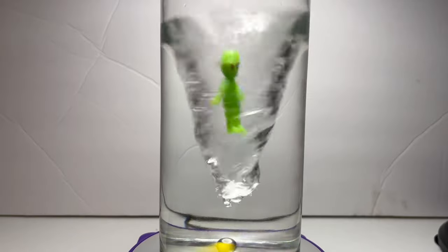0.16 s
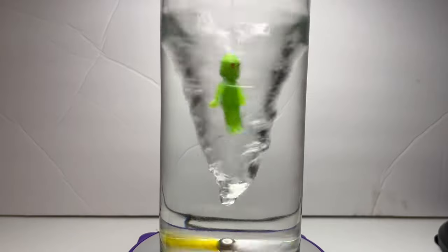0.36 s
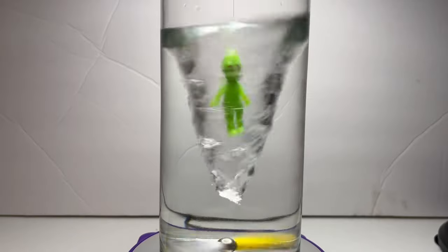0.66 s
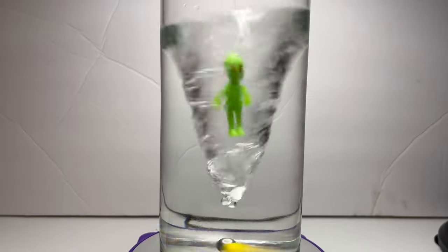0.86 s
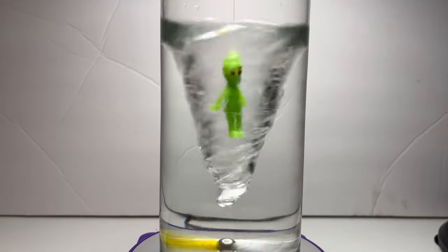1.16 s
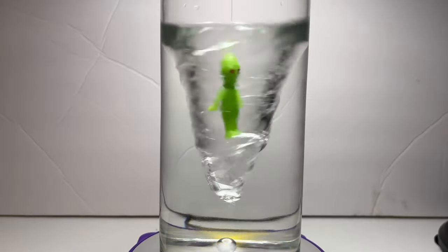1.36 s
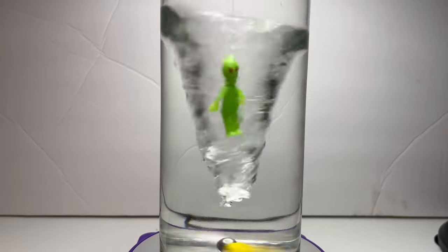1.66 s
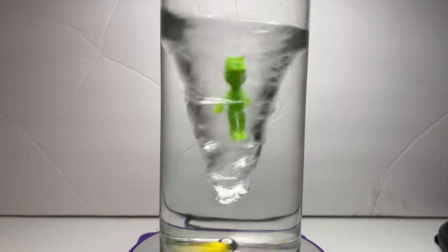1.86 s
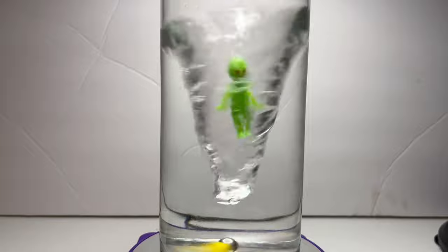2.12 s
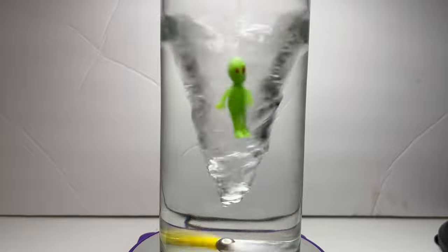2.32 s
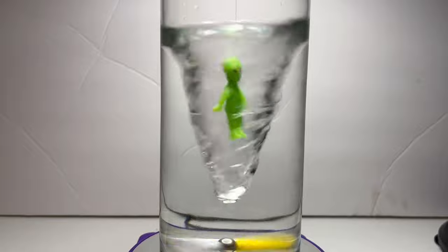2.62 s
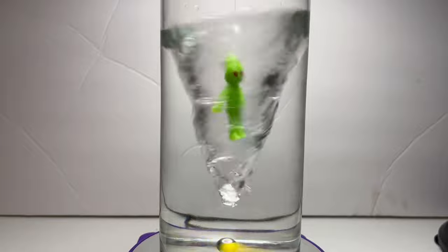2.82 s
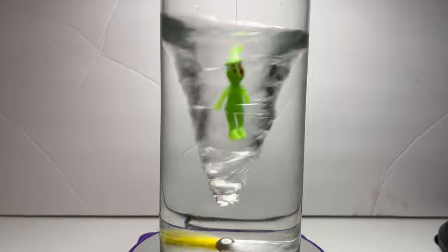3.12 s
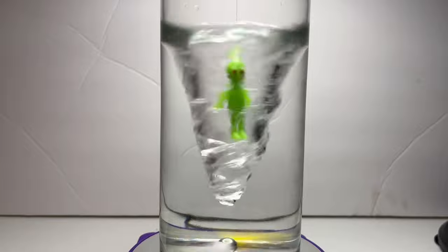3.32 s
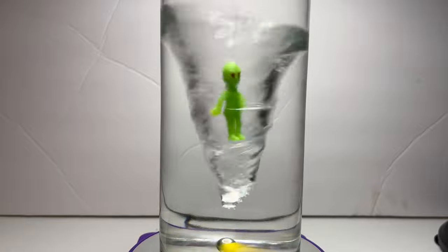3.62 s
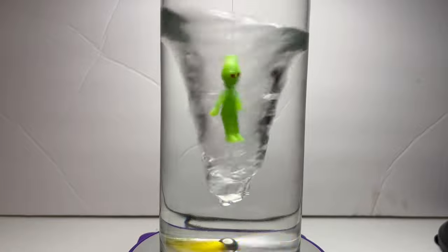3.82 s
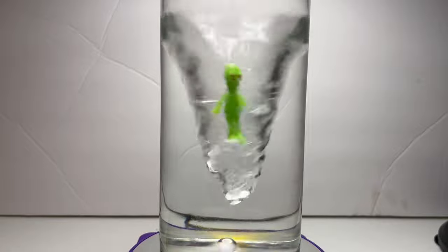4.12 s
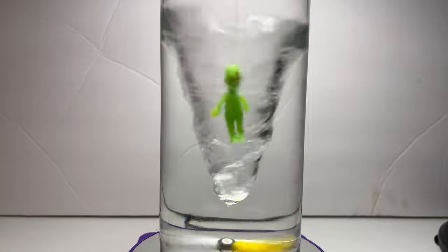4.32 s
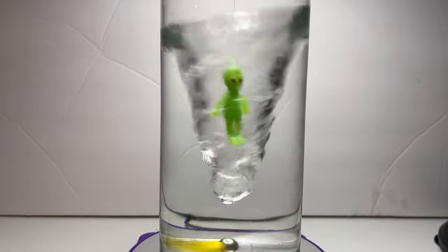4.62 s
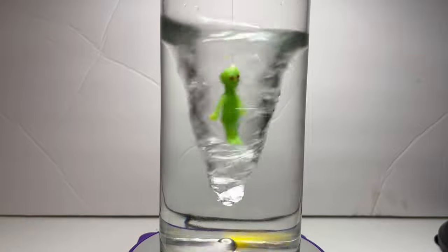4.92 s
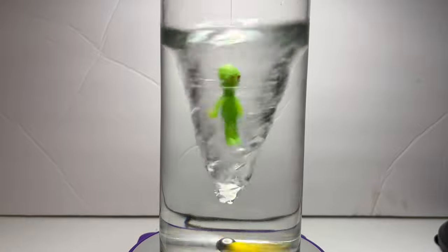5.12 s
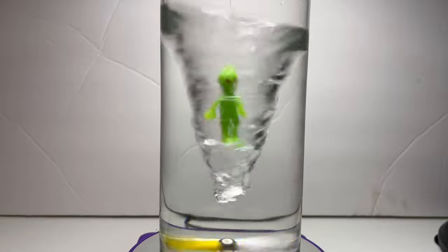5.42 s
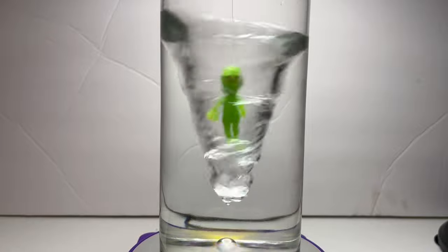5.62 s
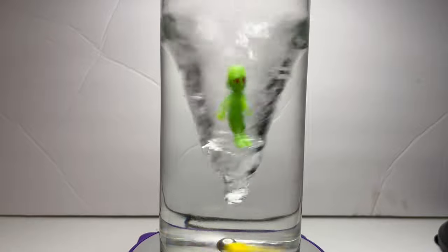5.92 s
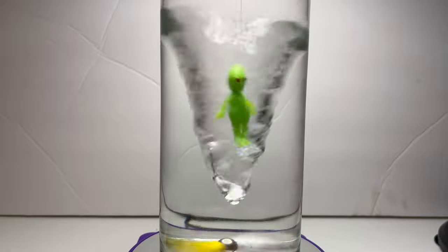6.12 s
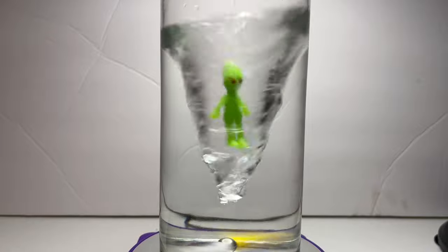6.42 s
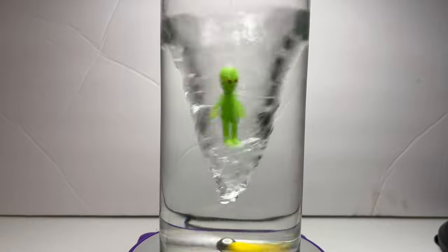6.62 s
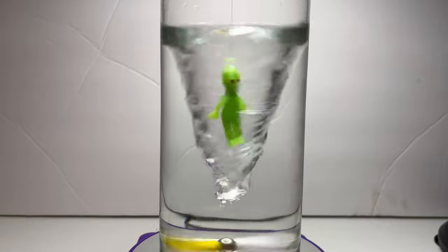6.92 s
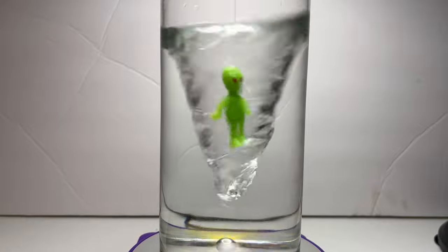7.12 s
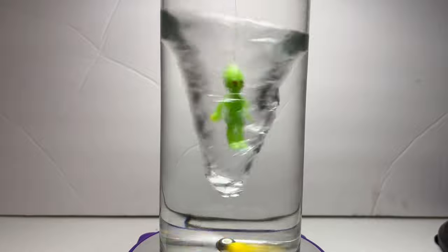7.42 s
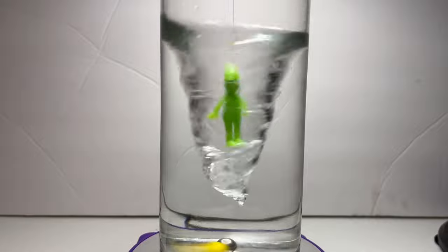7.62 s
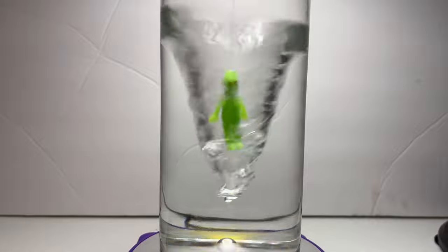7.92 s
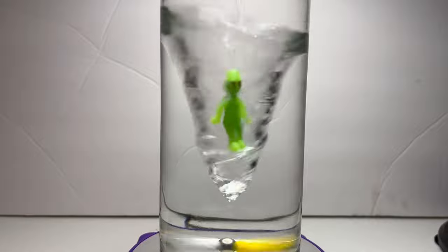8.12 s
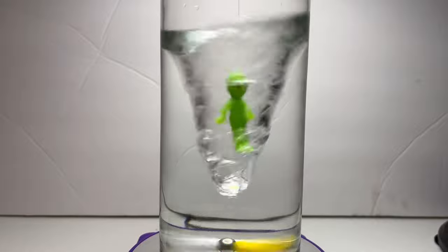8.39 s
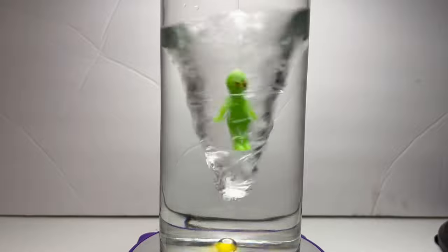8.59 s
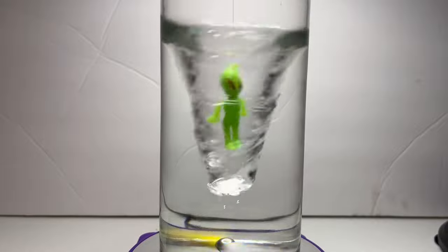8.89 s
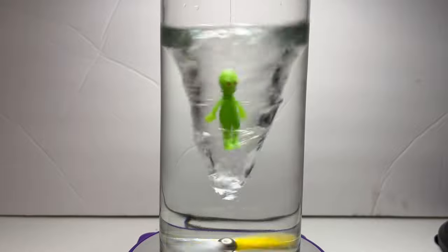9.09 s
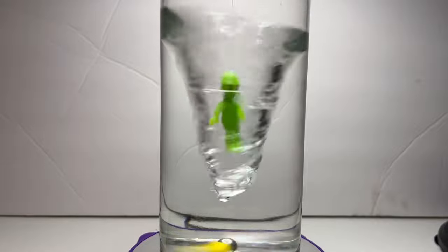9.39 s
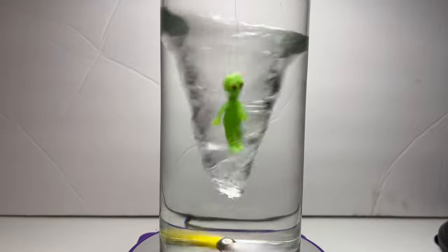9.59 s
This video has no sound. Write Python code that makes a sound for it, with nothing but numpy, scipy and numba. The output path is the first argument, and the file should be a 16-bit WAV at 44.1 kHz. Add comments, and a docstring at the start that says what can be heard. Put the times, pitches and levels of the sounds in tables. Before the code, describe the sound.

Close stereo phone pickup in a small room, with only a short diffuse reverberation. From the start, a small stir bar rattles on the bottom of a tall glass of water: fast, uneven, water-damped clicks, bright and glassy with a slight dull thump, joined by fine chatter and gritty scraping. Moderate knocks run to about 1.2 s, thin out, then return stronger in clusters from 1.7 to 2.8 s. A tight burst comes at 3.3-3.6 s, followed by a sparse lull until about 4.6 s, with a few isolated knocks. The rattle then surges, densest and loudest from 4.8 to 6.9 s, with a sharp peak near 5.8 s. It eases around 7-7.5 s, revives with a hard knock near 8.3 s, and continues in broken runs until the abrupt end near 9.75 s. Faint motor rumble, hum, thin whine and soft low gurgling persist underneath, slightly stronger after 4.8 s.

```python
"""Stir bar rattling in a glass

A stir bar skips on the bottom of a tall glass of water in uneven runs, close to a phone in a small room.
Knocks are swelling, decaying modes of glass, water column and stand; light chatter and grating noise fill the runs.
The whirlpool gurgles as low decaying tones. The motor below is coloured noise, wavering tones and a tick per turn.
Two microphone ports hear it all in stereo; the room returns a short diffuse tail of the bar."""
import sys
import numpy as np
from scipy import signal
from scipy.fft import rfft, irfft, next_fast_len
from scipy.io import wavfile
from scipy.ndimage import uniform_filter1d
from numba import njit

SR = 44100
rng = np.random.default_rng(int(sys.argv[2]) if len(sys.argv) > 2 else 0)


def pcm_store(signal):
    """Save signal as 16-bit PCM."""
    levels = np.round(np.clip(np.atleast_2d(signal), -1, 1) * 32767)
    wavfile.write(sys.argv[1], SR, levels.astype(np.int16).T)


N = 429975

# Level of motor and room air, followed by the gurgle: t/s, level/dB
MOTOR_LEVEL = [(0.0, -64), (3.3, -62), (3.8, -63.5), (4.62, -63.5), (4.8, -59), (6.4, -59), (7.1, -61.5),
               (8.5, -60), (9.75, -59)]
# Relative spectrum of rumble and room air: f/Hz, level/dB per Hz
AIR_SPECTRUM = [(15, -31), (25, -4), (76, -5.5), (240, -12), (454, -20.5), (549, -8.5), (632, -50),
                (879, -14.5), (1090, -33.5), (1590, -19), (1780, -28), (3880, -32.5), (6520, -41),
                (7000, -63), (9100, -76), (15400, -120)]
# Motor hum and whine: f/Hz, level/dB over the motor level
MOTOR_TONES = [(59.5, -7.5), (743, -20.5), (1610, -10.5)]
# Relative spectrum of the shaft tick: f/Hz, level/dB per Hz
TICK_SPECTRUM = [(400, -25), (650, -8), (1300, -1), (2000, -16), (2600, -12), (3000, -4), (3500, -16),
                 (4500, -28), (7000, -58)]
TURN_HZ = 69.35

# Clear knocks of the bar: t/s of the loudest moment, strength/dB,
# spot/dB (how much the high rings lead the lower wall), weight/dB (extra thump into stand and water column)
KNOCKS = [(0.021, -49.5, 6, -2), (0.044, -36.5, -2.5, 1.5), (0.063, -40.5, -4, 0.5), (0.102, -54.5, -3, 2),
          (0.13, -70, -6, -1), (0.155, -53, -20, 2), (0.198, -46, -15, -2), (0.216, -47, -1, 3),
          (0.235, -37, -1, -2.5), (0.271, -39, 8, 1.5), (0.315, -41, 2, 1), (0.352, -37, 6, 2),
          (0.399, -41.5, -14, -0.5), (0.432, -42, -1, 2.5), (0.453, -48, -6, 1), (0.472, -40, 1, 1.5),
          (0.51, -50, -5, 0), (0.576, -49.5, 2, 2.5), (0.595, -46.5, -4, -2), (0.634, -38, 0, 2),
          (0.68, -67, -6, 1), (0.717, -44.5, -4, 3), (0.756, -64, -6, 1), (0.806, -41.5, -6, 3.5),
          (0.853, -39, -1, -3), (0.89, -37, -10, 1.5), (0.929, -40, -10, -1), (0.962, -39.5, 2, 4.5),
          (0.997, -41, 0, 2.5), (1.038, -44.5, 12, 0), (1.072, -35.5, -6, -1), (1.117, -33.5, -7, -1),
          (1.149, -38, -15, 2.5), (1.164, -36.5, 3, -0.5), (1.183, -51, -14, 0), (1.202, -48, 3, 0),
          (1.22, -37, -3, 1.5), (1.387, -39.5, 0, 1), (1.438, -52, 2, 0.5), (1.488, -44, 13, -1),
          (1.528, -65, 0, -2), (1.574, -61.5, 15, -1), (1.683, -66, -5, 2), (1.706, -51, -5, -1),
          (1.725, -41, 7, -0.5), (1.745, -32, -1, -1.5), (1.802, -31.5, -3, -3), (1.834, -44.5, 11, 2.5),
          (1.878, -31.5, -3, 0), (1.968, -45.5, -3, 0.5), (2.005, -43, -6, 0.5), (2.026, -44, -10, 0),
          (2.042, -47.5, -12, 1), (2.089, -34.5, 1, -1.5), (2.112, -35.5, 7, 2), (2.201, -40, -1, -1.5),
          (2.284, -34.5, -6, -2.5), (2.316, -40.5, 5, 3.5), (2.358, -37, 0, 0), (2.371, -42, 0, -1),
          (2.391, -34, 5, 1.5), (2.429, -49, -15, 3), (2.47, -41.5, -8, -2), (2.506, -41.5, -16, 1),
          (2.538, -45, 11, 0.5), (2.558, -50, -9, -1), (2.58, -46, -9, 0), (2.624, -64, -4, 0),
          (2.665, -36.5, -4, 0.5), (2.7, -51, -8, -2), (2.721, -46, 2, 1), (2.737, -37, -6, -9),
          (2.769, -37, 2, 2.5), (2.851, -53, 1, 3), (2.944, -42.5, -2, 1), (2.96, -59, -13, -1),
          (3.035, -40, 10, 0.5), (3.115, -45.5, 12, 2.5), (3.137, -40, 4, -1.5), (3.169, -35.5, 2, 1.5),
          (3.222, -59, -12, 1), (3.271, -32, 0, -3.5), (3.307, -33, 1, 0), (3.341, -31, 4, 0.5),
          (3.356, -45, -4, -2), (3.375, -34, -10, 0.5), (3.407, -33, -5, 0.5), (3.442, -34, 3, 2),
          (3.483, -31, -7, -0.5), (3.497, -40.5, -8, -2), (3.516, -33.5, 11, -0.5), (3.529, -38, 3, -4),
          (3.548, -44.5, -6, 1), (3.586, -37, -1, 0), (3.608, -61, -3, 3), (3.628, -52.5, -6, 1),
          (3.716, -48, -1, -1.5), (3.756, -67, -5, -1), (3.965, -43, -13, -0.5), (4.019, -62, 11, -4),
          (4.104, -47.5, 16, -3.5), (4.142, -59, -6, 1), (4.281, -34, -9, 0.5), (4.3, -40, -12, 0),
          (4.362, -57.5, -7, 6), (4.5, -61.5, -3, 5), (4.545, -48, -3, 1.5), (4.58, -37.5, 0, 2.5),
          (4.601, -46, 2, 3), (4.622, -38.5, -7, -3), (4.638, -33, 1, 3), (4.656, -38.5, 5, 2),
          (4.746, -46, -9, -2), (4.764, -34, 17, 0.5), (4.793, -38.5, 14, 3.5), (4.816, -32, 8, -2.5),
          (4.832, -37.5, 4, 4), (4.86, -32.5, 26, -3), (4.875, -31.5, 11, 0), (4.895, -32, 6, 2),
          (4.909, -26, 4, 0.5), (4.958, -31, -2, 2.5), (4.974, -34.5, 1, 2), (4.999, -37, -9, -3),
          (5.036, -37.5, 1, 2), (5.055, -60, -12, 2), (5.08, -36, -6, -6), (5.126, -28, 7, -0.5),
          (5.144, -29.5, -3, 2), (5.175, -35, 12, -1), (5.197, -30, 2, 3.5), (5.227, -45, 1, 1),
          (5.247, -42, 0, -2.5), (5.265, -36, -4, -1), (5.285, -42, -3, 1.5), (5.308, -27.5, -2, 1),
          (5.345, -47, -15, -2), (5.362, -44.5, -21, -6), (5.379, -35.5, 4, -1), (5.418, -32, 1, 0),
          (5.438, -30.5, -3, -0.5), (5.451, -35, 6, 0.5), (5.468, -32, -4, 4), (5.504, -36, 2, 2),
          (5.522, -33, 8, -1), (5.54, -40, -6, -5), (5.559, -38.5, -5, 6), (5.601, -31, 19, 0.5),
          (5.635, -32.5, -4, -0.5), (5.651, -39.5, 4, -2.5), (5.699, -42, 9, -0.5), (5.714, -31, 5, -3),
          (5.76, -51, 6, -1), (5.784, -35, 15, -0.5), (5.819, -33, 6, 1), (5.84, -24, -3, 2.5),
          (5.873, -27.5, 16, 1.5), (5.906, -32.5, 5, 0), (5.924, -37.5, 13, 1), (5.945, -34.5, 8, -0.5),
          (5.961, -34.5, 16, 3), (5.979, -30, 6, 1), (5.998, -37, 17, -3), (6.012, -28, 6, -1),
          (6.026, -27.5, -1, -1), (6.044, -32.5, 5, 3), (6.077, -35, 11, -1.5), (6.146, -35, 3, 0),
          (6.207, -48, -4, -3), (6.224, -34.5, 3, 3), (6.243, -35.5, 0, -1), (6.304, -37, 3, -1),
          (6.328, -46.5, -2, 0), (6.347, -36, 15, 2), (6.365, -31.5, 4, 2.5), (6.381, -29, -5, -2),
          (6.413, -46, 1, 4), (6.435, -35, 3, -1), (6.481, -45, 2, 0), (6.499, -29, -1, 0),
          (6.515, -29, 7, 0), (6.55, -37, -10, 1.5), (6.563, -41, 7, 1), (6.585, -35.5, 10, 1),
          (6.623, -34.5, 6, 3), (6.665, -36.5, 9, -1), (6.683, -32, -7, 0), (6.723, -34.5, 3, 0),
          (6.738, -37, 7, -1), (6.76, -31, 4, 1), (6.777, -32, -5, 2), (6.843, -49, 2, -3),
          (6.861, -47, -18, -5), (6.885, -39, -1, 0), (6.902, -30, -4, -1), (6.918, -37, -10, 3.5),
          (6.938, -34, 0, -1.5), (6.962, -63, -15, -7), (6.979, -42, 4, 0), (6.998, -45, -10, -1.5),
          (7.02, -55, -2, 3), (7.037, -50, 5, -1), (7.059, -42, 9, 1.5), (7.157, -34, 5, 1),
          (7.19, -44, -2, 0), (7.215, -36.5, 3, -3), (7.253, -36.5, 14, -3), (7.275, -51, -7, 5),
          (7.287, -45, 5, 4), (7.308, -35, 10, 0), (7.327, -49, 1, -2), (7.344, -42.5, 13, -1),
          (7.365, -35.5, 4, 3), (7.427, -49, -2, 1.5), (7.449, -49, -11, 0), (7.471, -42, -7, -3),
          (7.538, -37.5, -9, -2), (7.587, -43, -8, -0.5), (7.607, -28.5, 13, 1.5), (7.643, -34.5, -3, 0),
          (7.685, -35.5, -4, -2.5), (7.699, -39, 1, 3), (7.718, -40, 3, 2), (7.738, -29.5, 5, 3),
          (7.827, -33.5, 3, 2.5), (7.847, -32.5, 0, 0), (7.901, -47, 10, -4), (7.911, -34, 12, 0.5),
          (7.942, -35.5, 7, -0.5), (7.961, -32.5, 1, -0.5), (7.978, -33.5, -4, 1.5),
          (7.998, -29.5, -3, -0.5), (8.032, -38.5, 2, 1), (8.049, -34.5, 4, 1.5), (8.09, -36, 12, 3),
          (8.106, -30.5, 5, -1), (8.249, -50, -1, -5), (8.256, -44, 5, -1), (8.273, -24.5, -5.5, 1),
          (8.329, -39.5, -8, -1), (8.349, -36, 5, 3.5), (8.366, -31.5, 6, -2), (8.39, -34, 6, 1),
          (8.404, -31, 1, 0.5), (8.421, -28.5, 3, 3.5), (8.453, -28.5, 12, -1), (8.469, -30.5, 15, 3),
          (8.527, -42, 5, -2), (8.542, -44.5, -1, 3.5), (8.586, -53, 4, 2), (8.607, -32, 6, 1.5),
          (8.625, -39, 3, 1), (8.696, -52, 5, -2), (8.717, -31.5, 2, 0), (8.752, -32, 6, 0.5),
          (8.79, -42.5, -15, 0), (8.81, -40, 2, -1), (8.829, -31.5, -2, 2), (8.845, -32.5, -3, 0),
          (8.95, -58, 5, -3), (8.972, -33.5, 14, 3), (9.007, -35, 10, -1), (9.036, -38.5, 10, 0),
          (9.059, -33.5, 4, 1), (9.099, -47, 8, -4), (9.114, -35.5, 7, 3.5), (9.137, -42.5, -4, 1),
          (9.149, -41, 10, 1), (9.171, -45, 6, -1), (9.188, -46, -2, -2), (9.235, -33, 10, 0),
          (9.323, -43, -5, -1.5), (9.342, -44, -8, -4), (9.362, -53, -7, -3), (9.383, -44.5, 2, 0),
          (9.402, -36, 5, -1.5), (9.422, -33.5, 10, 1), (9.458, -33.5, 3, 2.5), (9.477, -29.5, 2, -0.5),
          (9.527, -34, -2, 1), (9.548, -36.5, -9, -2), (9.589, -29, 0.5, 0.5), (9.678, -49, -18, -2),
          (9.704, -49, -5, 0), (9.72, -40, 3, -2.5), (9.737, -40, 10, 0)]
# Ringing modes of glass and stand: f/Hz, level/dB, left minus right/dB, left lead/rad
MODES = [(125, -14, 0, 0), (344, -12, 2, 0.6), (473, -18, 2, -0.1), (904, -27, 2, -0.0),
         (1291, -19, 10, -0.9), (1614, -18, -2, -1.2), (1808, -25, 3, -0.2), (2777, -25, 1, 0.6),
         (3919, -13, 0, 0.9), (4672, -18, 4, 0.5), (4974, -12, 0, 2.1), (5155, -7, 8, -0.2),
         (5318, -4, 4, -0.4), (5943, -16, 0, -1.1), (6890, -18, 4, -2.1), (7256, -9, 0, -1.8),
         (7450, 0, 2, -2.3), (8053, -13, 1, 3.1), (8764, -13, 0, 2.8), (9000, -4, 0, 2.5),
         (9560, -17, 0, 2.0), (9797, -20, -1, 1.8), (10142, -22, -1, 1.6), (10852, -17, 0, 0.8),
         (11025, -22, 0, 0.6), (11412, -28, 0, 0.0), (12747, -26, 0, -0.3), (13996, -33, -1, -1.9),
         (14448, -28, 0, -2.3), (15051, -36, 0, 3.1)]
# Boundaries between the six families of modes, low to high: f/Hz
FAMILY_EDGES_HZ = (700, 4400, 6500, 8300, 10500)
# One row each for stand, water column, lower wall, upper wall, base, rim:
# level/dB for a usual knock, slope/dB per dB of strength, slope/dB per dB of spot
FAMILY_LEVELS = [(-30.5, 0.41, 0.0869), (-26, 0.4124, 0.0757), (-25, 0.9971, -0.51), (-24.5, 1.13, 0.307),
                 (-20, 1.3038, 0.3249), (-26.5, 1.16, 0.32)]
# Decay by 60 dB of each family, damped by the water: t/s
FAMILY_T60_S = (.075, .045, .04, .036, .028, .032)
# Relative spectrum of the grating contact: f/Hz, level/dB per Hz
GRATE_SPECTRUM = [(88, -7), (150, -8.5), (340, 2), (413, -7.5), (520, -7.5), (700, -19.5), (1030, -19.5),
                  (1300, -9.5), (2110, -16.5), (3100, -13), (3940, -5), (4790, -9), (5280, -2),
                  (6540, -14.5), (7200, -9.5), (9280, -14), (14200, -22.5), (15700, -44)]
# Lag of the left port behind the right, dull then bright grating: t/s
PORT_LAG_S = (-.00002, .00018)
USUAL_KNOCK_DB = -40
CONTACT_S = .009  # first touch to loudest moment
SWELL_S = .0062  # the bar skids in, so the ring builds up
LOOSE_STAND = 6  # the stand rattles: its pitches scatter this many times more than the glass
CHATTER_DB, CHATTER_DB_PER_S = -12, -400  # against the weaker neighbouring knock, and per second of gap
GRATE_SPLIT_HZ = 4400  # the water column carries the grating below, the wall above

# Response of the phone's microphone: f/Hz, level/dB
MICROPHONE = [(25, -20), (40, -8), (50, -1), (60, 0), (11400, 0), (12100, -14), (12400, -10), (12800, 0),
              (15000, 0), (15600, 9)]
# Relative spectrum of the microphone's own noise: f/Hz, level/dB per Hz
HISS_SPECTRUM = [(3000, -7), (8000, -15), (13500, -3), (15500, -15)]
HISS_DB, TOP_HZ = -83.5, 15700  # the hiss level is set before the top is cut


def undb(db):
    """Turn decibels into an amplitude factor."""
    return 10 ** (np.asarray(db) / 20)


def unit(x):
    """Scale to an overall RMS of 1."""
    return x / np.sqrt(np.mean(x ** 2))


def curve(table):
    """Join (t/s, value) points by straight lines over the whole scene."""
    s, value = np.transpose(table)
    return np.interp(np.arange(N) / SR, s, value)


def colour(x, points):
    """Shape a signal by (f/Hz, level/dB) points joined on a log frequency axis."""
    size = next_fast_len(N)
    hz, db = np.transpose(points)
    axis_hz = np.maximum(np.arange(size // 2 + 1) * SR / size, 1)
    gain = undb(np.interp(np.log(axis_hz), np.log(hz), db))
    return irfft(rfft(x, size) * gain, size)[..., :N]


def waver(rate_hz):
    """Random levels, one per 1 / rate_hz seconds, smoothed by two moving averages to an RMS of 1."""
    hold = int(SR / rate_hz)
    steps = np.repeat(rng.standard_normal(N // hold + 1), hold)
    smooth = uniform_filter1d(uniform_filter1d(steps, hold), hold)
    return unit(smooth[:N])


def motor():
    """Rumble and air hiss, a few wavering tones and a soft noise tick on each turn of the shaft."""
    mid, side = unit(colour(rng.standard_normal((2, N)), AIR_SPECTRUM))
    # the ports differ less in the bass
    side = signal.sosfilt(signal.butter(1, 350, "high", fs=SR, output="sos"), side) + .25 * side
    air = (mid + side * np.array([[1], [-1]])) * undb(-1 + 1.5 * waver(7))

    tones = np.zeros(N)
    for hz, db in MOTOR_TONES:
        level = undb(db + 2.3 * waver(3))
        pitch_hz = hz * (1 + 0.001009 * waver(5))
        tones += level * np.sin(2 * np.pi * np.cumsum(pitch_hz) / SR)

    turn = np.cumsum(TURN_HZ * (1 + 0.0058 * waver(3.4)) / SR) % 1  # fraction of a turn
    burst = np.exp(-turn / .06) * rng.standard_normal((2, N))
    tick = unit(colour(burst, TICK_SPECTRUM))
    return undb(curve(MOTOR_LEVEL)) * (air + tones + undb(-6.5) * tick)


@njit
def ring(start, size, pole, rise, ports, length):
    """Every blow starts every mode; each swells, dies away and reaches both ports with its own phase."""
    out = np.zeros((2, length))
    for i in range(len(start)):
        for m in range(size.shape[1]):
            z, gap, n = size[i, m], 1., start[i]
            while n < length and abs(z.real) + abs(z.imag) > 3e-6:
                z *= pole[i, m]  # one sample of rotation and decay
                gap *= rise
                w = z * (1 - gap) ** 3  # the swell
                out[0, n] += (w * ports[0, m]).imag
                out[1, n] += (w * ports[1, m]).imag
                n += 1
    return out


def glass(s, family_db, scatter_db, detune):
    """Blows land on ever new spots of a sloshing glass: mode sizes scatter and pitches shift a little."""
    hz, db, pan_db, lead = np.transpose(MODES)
    family = np.searchsorted(FAMILY_EDGES_HZ, hz)
    level_chance, phase_chance, pitch_chance = np.moveaxis(rng.standard_normal((len(s), 3, len(hz))), 1, 0)
    size = undb(family_db[:, family] + db + scatter_db * level_chance) * np.exp(10j * phase_chance)
    looseness = np.where(family == 0, LOOSE_STAND, 1)
    mode_hz = hz * (1 + detune * looseness * pitch_chance)
    decay = np.log(1000) / np.array(FAMILY_T60_S)[family]
    pole = np.exp((2j * np.pi * mode_hz - decay) / SR)
    ports = undb(np.array([pan_db, -pan_db]) / 2) * np.exp(.5j * np.array([lead, -lead]))
    return ring((s * SR).astype(np.int64), size, pole, np.exp(-1 / (SWELL_S * SR)), ports, N)


def knock_and_rebound(first, family_db):
    """Each clear knock rings the glass; the bar rebounds once, softly, 8 to 17 ms later."""
    knocks = glass(first, family_db, scatter_db=3.5, detune=0.0057)
    late, soft = rng.random((2, len(first)))
    rebound_db = family_db - 4.5 - 20.6 * soft[:, None]
    return knocks + glass(first + .008 + .009 * late, rebound_db, scatter_db=6.0, detune=0.0087)


def light_touches(s, strength_db, count=900):
    """Random touches between knocks, weaker in long gaps; returns their times and levels."""
    place, force = rng.random((2, count))
    at = s[0] + place * (s[-1] - s[0])
    gap = np.searchsorted(s, at) - 1
    weaker_db = np.minimum(strength_db[1:], strength_db[:-1])
    gap_db = weaker_db + CHATTER_DB + CHATTER_DB_PER_S * np.diff(s)
    return at, gap_db[gap] - 2.2 * np.log(1 - force)


def scrape(s, db, lag_s, alike, t60, rise_s=0.0027):
    """Each contact grates briefly; part of its noise reaches both ports alike, apart from a small lag."""
    kicks = np.zeros(N)
    np.add.at(kicks, (s * SR).astype(int), undb(db) ** 2)
    fall = np.exp(-2 * np.log(1000) / (t60 * SR))  # twice the rate, since this is power
    rise = np.exp(-1 / (rise_s * SR))
    power = signal.lfilter([1 - rise], [1, -rise], signal.lfilter([1], [1, -fall], kicks))
    shared, left, right = unit(colour(rng.standard_normal((3, N)), GRATE_SPECTRUM))
    late = np.roll(shared, round(lag_s * SR))
    common = np.sqrt(alike) * np.array([late, shared])
    separate = np.sqrt(1 - alike) * np.array([left, right])
    return np.sqrt(power) * (common + separate)


def grating(contacts, column_db, rim_db, touch_db):
    """Bar on glass: dull noise through the water column, bright noise through the wall."""
    dull_db = np.r_[column_db - 20.2, touch_db - 6]
    bright_db = np.r_[.55 * rim_db + .45 * column_db - 17.5, touch_db - 3]
    dull = scrape(contacts, dull_db, PORT_LAG_S[0], alike=0.66, t60=0.11)
    bright = scrape(contacts, bright_db, PORT_LAG_S[1], alike=0.14, t60=0.081)
    low = signal.butter(3, GRATE_SPLIT_HZ, "low", fs=SR, output="sos")
    high = signal.butter(3, GRATE_SPLIT_HZ, "high", fs=SR, output="sos")
    return signal.sosfilt(low, dull) + signal.sosfilt(high, bright)


def stir_bar():
    """Strength, spot and weight of each contact set how far it drives each family of modes and the grating."""
    s, strength_db, spot_db, weight_db = np.transpose(KNOCKS)
    first = np.maximum(s - CONTACT_S, 0)
    usual_db, per_strength, per_spot = np.transpose(FAMILY_LEVELS)
    family_db = usual_db + np.outer(strength_db - USUAL_KNOCK_DB, per_strength) + np.outer(spot_db, per_spot)
    family_db[:, :2] += weight_db[:, None]  # stand and water column
    knocks = knock_and_rebound(first, family_db)

    at, touch_db = light_touches(s, strength_db)
    touch_family_db = touch_db[:, None] + np.array([6, 14.0, 25, 2.1, 3.4, 7])
    chatter = glass(at, touch_family_db, scatter_db=4.5, detune=0.0067)

    contacts = np.r_[first + .002, at]
    return knocks + chatter + grating(contacts, family_db[:, 1], family_db[:, 5], touch_db)


def room(x, t60=0.18, db=-13, alike_hz=600):
    """Walls send back a diffuse tail, alike at both ports in the bass and less alike above."""
    t = np.arange(int(.5 * SR)) / SR
    decay = np.exp(-np.log(1000) * t / t60) * (t > .004)  # nothing returns in the first 4 ms
    mid, side = rng.standard_normal((2, len(t))) * decay
    side = signal.sosfilt(signal.butter(1, alike_hz, "high", fs=SR, output="sos"), side)
    tail = signal.sosfilt(signal.butter(2, 7000, fs=SR, output="sos"), [mid + side, mid - side])
    tail /= np.sqrt(np.sum(tail ** 2, axis=1, keepdims=True))
    return undb(db) * signal.fftconvolve(x, tail, axes=1)[:, :N]


def gurgle(count=260, low_hz=85, high_hz=190, t60=0.28, swell_s=0.0049):
    """The whirlpool gulps: pockets of air of random size ring low and soft, alike at both ports."""
    when, pitch, force = rng.random((3, count))
    start = (when * (N - 1)).astype(np.int64)
    hz = low_hz * (high_hz / low_hz) ** pitch
    size = undb(curve(MOTOR_LEVEL)[start] - 2.5 * np.log(1 - force)) + 0j
    pole = np.exp((2j * np.pi * hz - np.log(1000) / t60) / SR)
    rise = np.exp(-1 / (swell_s * SR))
    return ring(start, size[:, None], pole[:, None], rise, np.ones((2, 1), complex), N)


def scene():
    """The motor runs under the glass; only the bar's rattle excites the room tail."""
    motor_sound = motor()
    rattle = stir_bar()
    return motor_sound + rattle + room(rattle) + gurgle()


def record(dry):
    """The phone thins the deep bass, has a notch in the treble, hisses faintly and cuts the top."""
    hiss = undb(HISS_DB) * unit(colour(rng.standard_normal(dry.shape), HISS_SPECTRUM))
    top_cut = signal.ellip(10, .2, 80, TOP_HZ, fs=SR, output="sos")
    return signal.sosfilt(top_cut, colour(dry, MICROPHONE) + hiss)


dry = scene()
out = record(dry)
pcm_store(out)
```